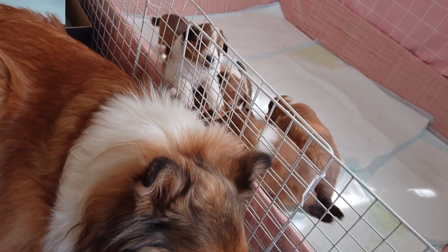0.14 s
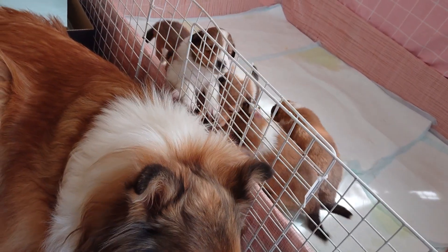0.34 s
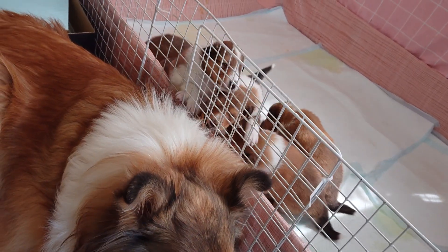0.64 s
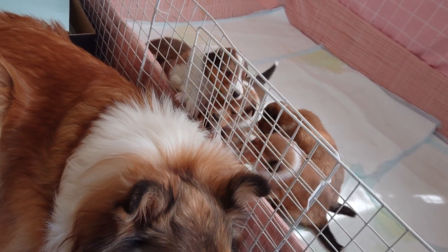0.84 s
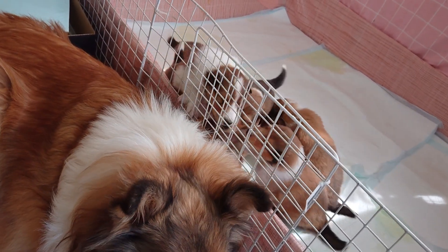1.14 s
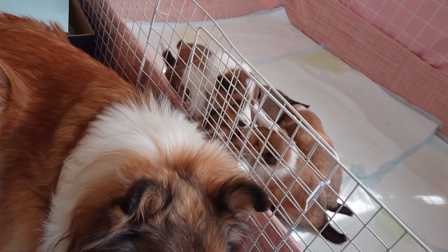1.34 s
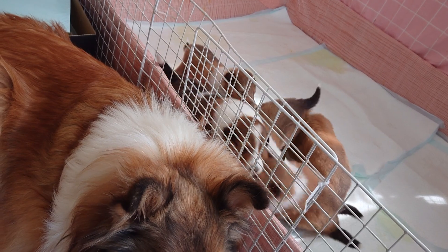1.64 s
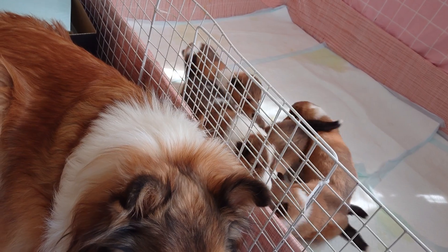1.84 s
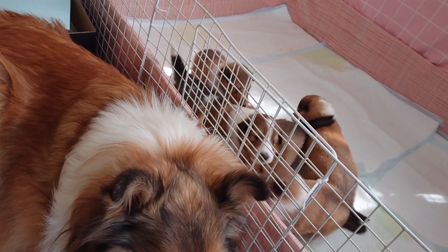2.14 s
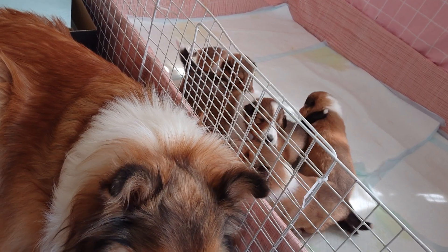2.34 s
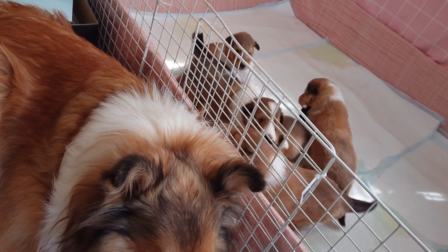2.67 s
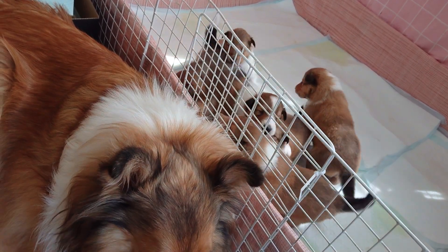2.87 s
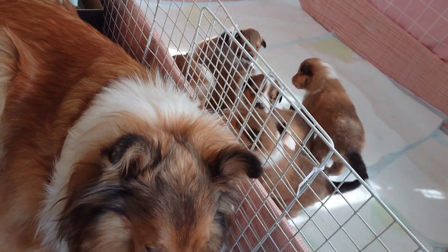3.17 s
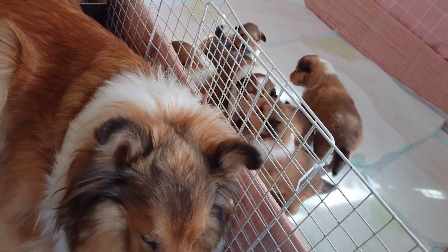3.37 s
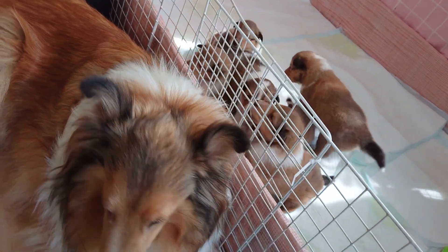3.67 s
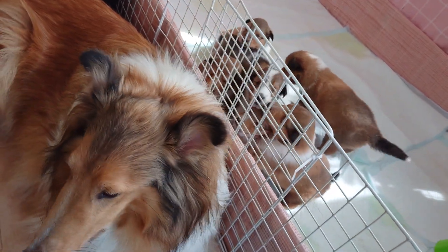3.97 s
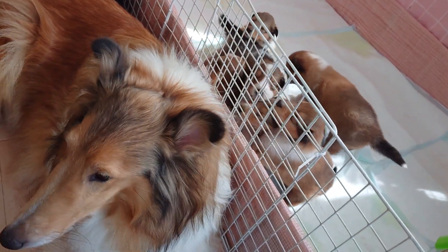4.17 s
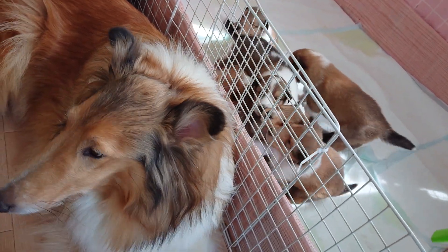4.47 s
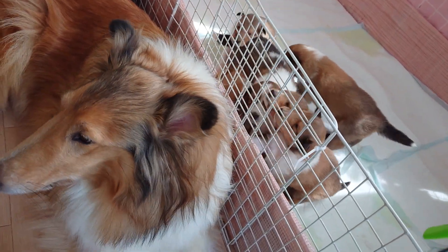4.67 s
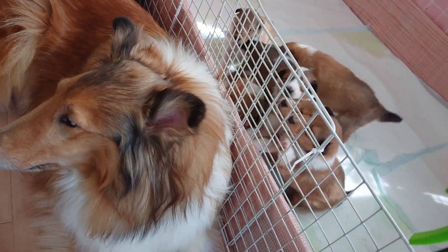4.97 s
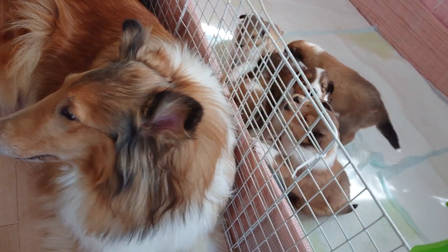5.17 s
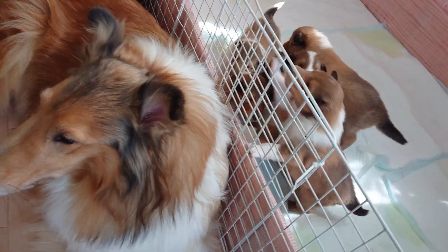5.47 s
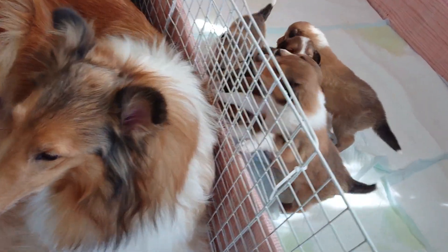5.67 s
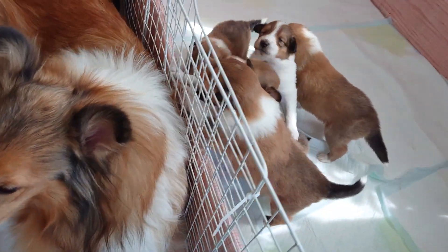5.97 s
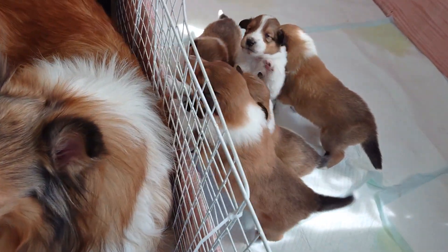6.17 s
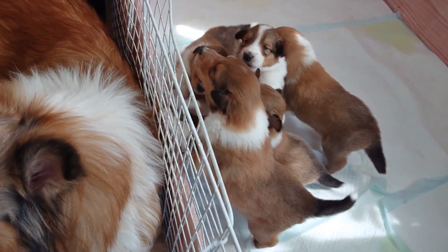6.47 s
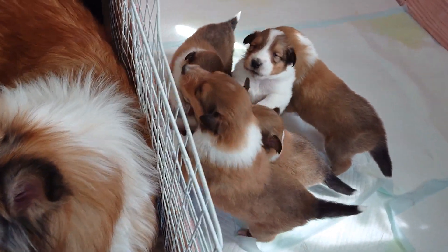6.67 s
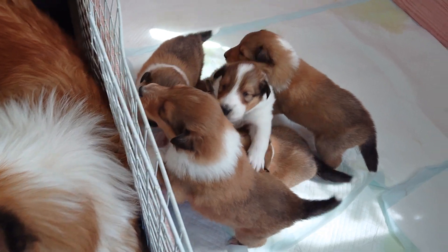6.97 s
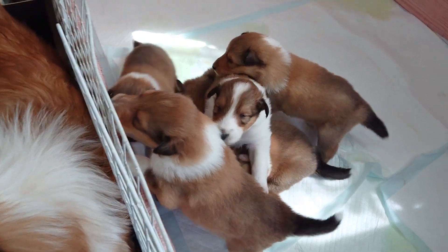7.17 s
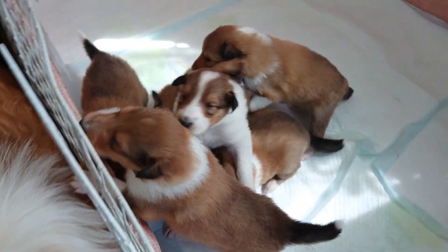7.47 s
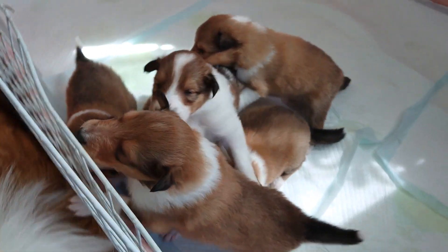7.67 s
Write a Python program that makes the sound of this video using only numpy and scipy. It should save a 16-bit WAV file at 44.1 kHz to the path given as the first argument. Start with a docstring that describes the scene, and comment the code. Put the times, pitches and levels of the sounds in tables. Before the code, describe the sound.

Two thin high peeps open over faint room air, with light claw taps. A flurry of ticking claws and scuffing paws follows, then low, short puppy whimpers come one after another. The wire pen rattles sharply, and afterwards the puppies squirm more busily, bumping and scratching while their whines grow stronger. Heard close by in stereo, indoors, with a short room tail.

```python
"""Young puppies in a wire pen

Puppies whimper in short arched tones and whistle thinly: near-pure tones with faint, patchy overtones.
Claws tick as damped mat modes plus grit; paws scuff as stick-slip grains; bodies bump as low noise.
Jolts ring the pen's frame and wires. Sources get short room tails over faint room air; two ports hear all.
"""
import sys
import numpy as np
from scipy import signal
from scipy.fft import rfft, irfft
from scipy.io import wavfile
from scipy.ndimage import uniform_filter1d

SR = 44100
rng = np.random.default_rng(int(sys.argv[2]) if len(sys.argv) > 2 else 0)


def generate_wav(sig):
    """Save sig (samples, or channels by samples) to the path in sys.argv[1] as 16-bit PCM at SR."""
    pcm = np.round(np.clip(np.atleast_2d(sig).T, -1, 1) * 32767).astype(np.int16)
    wavfile.write(sys.argv[1], SR, pcm)


N = 344862
TOP_HZ = 15900  # upper edge of the microphone and of the overtones

# paws sliding over the mat: start/s, peak/s, end/s, level/dB, treble/dB, added weight/dB
SCUFFS = [(0.921, 0.999, 1.06, -48.5, 6, -20), (1.478, 1.57, 1.74, -72.5, -7, 22),
          (1.735, 1.902, 2.04, -36, 5.5, 1.5), (2.044, 2.051, 2.11, -34.5, 4.5, 1),
          (2.84, 2.875, 3.00, -33.5, 2.5, -7), (4.08, 4.1, 4.15, -40, 0, -2.5),
          (4.401, 4.429, 4.52, -37.5, 4.5, -1), (4.558, 4.561, 4.67, -42, 4.5, -12),
          (5.459, 5.487, 5.66, -31.5, 7, 2.5), (5.812, 5.818, 5.93, -30, -42, -3.5),
          (5.979, 6.083, 6.36, -49.5, 2.5, -1.5), (6.42, 6.44, 6.51, -43.5, 2, 3),
          (6.514, 6.523, 6.66, -41, 1.5, 4.5), (6.671, 6.681, 6.82, -43, 4.5, 0.5),
          (7.126, 7.156, 7.23, -31.5, -0.5, -6.5), (7.291, 7.313, 7.48, -33.5, 4.5, 6),
          (7.56, 7.687, 7.81, -56, 11, -8)]
# rasp of a paw on the mat: f/Hz, gain/dB
RASP = [(60, -22), (200, 2), (350, 5), (600, 2.5), (1400, -5.5), (2300, 2), (3400, -3), (5500, -5.5),
        (8000, -14.5), (15000, 1)]


def undb(db):
    """Decibels to gain."""
    return 10 ** (np.asarray(db) / 20)


def unit(x):
    """Scale to an rms of one."""
    return x / np.sqrt(np.mean(x ** 2) + 1e-20)


def read(points, hz):
    """Value of a (f/Hz, dB) spectrum at hz, on a log-frequency axis."""
    f, value = np.transpose(points)
    return np.interp(np.log(np.maximum(hz, 1)), np.log(f), value)


def colour(x, points, size=4096):
    """Minimum-phase filter with the gain of (f/Hz, dB) points, by folding the cepstrum."""
    log_gain = np.log(undb(read(points, np.fft.rfftfreq(size, 1 / SR))))
    cepstrum = irfft(log_gain)
    cepstrum[1:size // 2] *= 2
    cepstrum[size // 2 + 1:] = 0
    response = irfft(np.exp(rfft(cepstrum)))
    filtered = signal.fftconvolve(np.atleast_2d(x), response[None], axes=1)
    return filtered[:, :x.shape[-1]].reshape(x.shape)


def band(x, hz, kind, order=2):
    """Butterworth filter."""
    return signal.sosfilt(signal.butter(order, hz, kind, fs=SR, output="sos"), x)


def walk(n, rate_hz):
    """Smoothed random steps at rate_hz; spread near one."""
    k = max(int(SR / rate_hz), 1)
    steps = np.repeat(rng.standard_normal(n // k + 1), k)
    return uniform_filter1d(steps, k)[:n] * np.sqrt(3 / 2)


def add(out, s, sound, pan_db=0):
    """Mix a sound into both channels at time s; pan_db is left minus right."""
    i = max(int(s * SR), 0)
    sound = np.atleast_2d(sound)[:, :max(N - i, 0)]
    out[:, i:i + sound.shape[1]] += sound * undb(np.array([[pan_db], [-pan_db]]) / 2)


def grains(n, rate_hz, spread_db):
    """Dense tiny slips of either sign: many small ones and a few large."""
    chance = rng.random((n, 3))
    size = undb(spread_db * np.minimum(-np.log(1 - chance[:, 0]), 4))
    happens = chance[:, 1] < rate_hz / SR
    return unit(happens * size * np.sign(chance[:, 2] - .5))


def ring(modes, t):
    """Free decay of (f/Hz, level/dB, t60/s) modes."""
    return sum(undb(db) * np.sin(2 * np.pi * hz * t) * np.exp(-np.log(1000) * t / t60_s)
               for hz, db, t60_s in modes)


def brighten(x, treble_db):
    """Sharper contact gives more of the top octave."""
    return colour(x, [(5000, 0), (10000, treble_db)], size=256)


def air(level_db=-54.5, waver_db=0.04):
    """Steady room rumble, much alike in both channels, under a faint hiss that is less so."""
    # room air: f/Hz, relative density/dB
    air_spectrum = [(25, -12), (36, -14), (46, 12), (62, 1.5), (80, 3), (98, 1.5), (140, -12), (300, -12),
                    (500, -17.5), (850, -12), (2200, -19.5), (4000, -35), (8000, -45), (15000, -19)]
    mid, side = rng.standard_normal((2, N))
    side = 0.19 * side + 1.2 * band(side, 1000, "high", order=1)
    noise = unit(colour(np.array([mid + side, mid - side]), air_spectrum, size=16384))
    return undb(level_db + waver_db * walk(N, 2.66)) * noise


def fidgeting(early_db=-70, late_db=-62, treble_db=7):
    """Faint stick-slip rustle of fur and small feet, busier as the litter piles up: its level climbs."""
    slips = np.array([grains(N, 500, 4) for _ in range(2)])
    rustle = brighten(unit(colour(slips, RASP)), treble_db)
    return rustle * undb(np.linspace(early_db, late_db, N))


def bumps(rise_s=0.0016, fall_s=0.012, trim_db=3):
    """Soft contacts of paws and bodies push for longer, so they carry little treble."""
    # contacts: t/s, level before trim and envelope/dB, upper edge/Hz
    contacts = [(0.08, -59, 520), (0.384, -70, 520), (1.375, -66, 1610), (1.58, -63, 140),
                (1.851, -42, 130), (2.417, -46.5, 477), (2.848, -38.5, 480), (2.944, -46, 507),
                (3.119, -47, 1500), (3.368, -51, 760), (3.482, -46.5, 125), (3.51, -52, 458),
                (3.77, -57, 800), (4.564, -43, 380), (5.20, -45.5, 134), (5.821, -35, 207),
                (6.314, -45, 590), (6.53, -44.5, 336), (6.538, -30.5, 151), (7.298, -37.5, 107),
                (7.469, -42, 250), (7.601, -38.5, 89)]
    out, t = np.zeros((2, N)), np.arange(SR // 4) / SR
    push = (1 - np.exp(-t / rise_s)) * np.exp(-t / fall_s)
    for s, db, edge_hz in contacts:
        thud = unit(band(rng.standard_normal(len(t)), [edge_hz / 4.9, edge_hz], "band"))
        add(out, s, undb(db + trim_db) * thud * push)
    return out


def pen(chatter_s=0.0033, clash_db=-2, clash_s=0.073, thud_rise_s=0.0014, clash_hz=7500):
    """A jolt rocks the frame; the wire panels chatter against each other and ring on."""
    # jolts: t/s, frame thud/dB, wire shiver/dB
    jolts = [(5.473, -36.5, -33), (5.522, -36.5, -34.5), (5.715, -44, -39), (5.75, -44.5, -34.5)]
    # frame modes: f/Hz, level/dB, t60/s
    frame_modes = [(64.7, -11.5, 1), (99.7, 3.5, 0.24), (138, -8.5, 0.79), (156.3, -6, 0.35),
                   (305.3, -12, 0.56)]
    # wire modes: f/Hz, level/dB, t60/s
    wire_modes = [(2869, -14, .5), (6977, -6, .45), (7900, -8, .4), (10170, 0, .4), (10870, 0, .45),
                  (11225, -3, .5), (11353, -3, .4), (11726, 0, .4), (12050, -6, .5), (12709, 1, .35),
                  (13750, 1, .4), (14340, -6, .5), (14790, -5, .3)]
    out, t = np.zeros((2, N)), np.arange(SR // 2) / SR
    thud = ring(frame_modes, t) * (1 - np.exp(-t / thud_rise_s))
    for s, thud_db, wire_db in jolts:
        contacts = np.array([grains(len(t), 5000, 4.5) for _ in range(2)]) * (1 - np.exp(-t / .002))
        chatter = contacts * np.exp(-t / chatter_s)
        wires = signal.fftconvolve(chatter, ring(wire_modes, t)[None], axes=1)[:, :len(t)]
        wires = undb(-8) * wires / wires[:, :SR // 20].std()  # level set over the first 50 ms
        clash = band(contacts, clash_hz, "high") * np.exp(-t / clash_s) * undb(clash_db)
        add(out, s, undb(wire_db) * (wires + clash) + undb(thud_db) * thud)
    return out


def paws(slip_rate_hz=1900, spread_db=4.0, rise_db=20, fall_db=22, weight_db=-9, trim_db=-1):
    """A sliding paw sticks and slips; the weight behind it makes the mat rumble."""
    out = np.zeros((2, N))
    for start, peak, end, db, treble_db, heavy_db in SCUFFS:
        t = np.arange(start, end, 1 / SR)
        press = undb(db + np.interp(t, [start, peak, end], [-rise_db, 0, -fall_db]))
        slips = grains(len(t), slip_rate_hz, spread_db)
        apart = band(grains(len(t), slip_rate_hz, spread_db), 1600, "high") * 0.66  # widens the treble
        rasp = brighten(unit(colour(np.array([slips + apart, slips - apart]), RASP)), treble_db)
        rumble = unit(band(slips, [80, 380], "band")) * undb(weight_db + heavy_db)
        add(out, start, (rasp + rumble) * press * undb(trim_db))
    return out


def catches(count=3, above_db=-43, scatter_db=1.5, pan_spread_db=13):
    """Chance claw taps of a hard-pressed sliding paw, gathered round its peak; rows as in claws()."""
    peak_offset_db, crunch_offset_db = -6.5, -11.5  # over the scuff's level
    rows = []
    for start, peak, end, db, *_ in SCUFFS:
        if db <= above_db:  # only the pad slides
            continue
        for when, size, side in rng.standard_normal((count, 3)):
            s = np.interp(when, [-3, -.5, 3], [start, peak, end])
            catch_db = db + scatter_db * size
            rows.append((s, catch_db + peak_offset_db, catch_db + crunch_offset_db, pan_spread_db * side))
    return rows


def claws(tap_trim_db=3, crunch_trim_db=17, settle_s=0.00044, crunch_fall_s=0.0013, detune=0.089):
    """Each tap rings claw and mat for some milliseconds, and crunches as the claw settles."""
    # distinct taps on mat and wire, before trims: t/s, peak/dB, crunch/dB, left-right/dB
    taps = [(0.078, -41, -52, 0), (0.1947, -41.5, -52, 5), (0.3102, -46.5, -60, 5), (1.2185, -59, -59, -1),
            (1.3785, -40, -78, 0), (1.4947, -50, -59, 0), (1.7924, -30, -63, -5), (1.8374, -28, -48, -3),
            (1.8422, -31, -55, -4), (1.8902, -28, -50, -3), (1.9076, -30, -57, -2),
            (1.9131, -26.5, -55, -4), (1.957, -34.5, -39, -5), (2.0514, -26.5, -49, 0),
            (2.0565, -27, -47, 4), (2.061, -28, -31, -3), (2.1381, -23, -30, 0.5), (2.4161, -30, -42, 2.5),
            (2.807, -39.5, -48.5, 1), (2.8168, -38.5, -49, 2), (2.8486, -31.5, -45, -1),
            (2.9434, -33, -41, 4), (3.8292, -49, -51, 0), (4.0836, -34, -43, 0), (4.104, -35.5, -46, -7),
            (4.3324, -58, -46, 0), (4.4006, -33, -39, 0.5), (4.4214, -42, -38, -5), (4.563, -48, -46, -2),
            (5.232, -44.5, -48, 3), (5.3647, -37, -48, 3), (5.3906, -34.5, -44.5, 2),
            (5.4131, -29, -40.5, 2.5), (5.8192, -30, -56, -14), (5.869, -34.5, -47, 3),
            (5.982, -30, -42.5, 2.5), (6.3052, -38, -46, 6), (6.3809, -32.5, -41, 2),
            (6.4352, -34, -41.5, 3.5), (6.5306, -30, -41.5, 10), (6.5932, -32.5, -38, 4),
            (6.769, -35, -52, 3), (6.9207, -34, -45, 6), (7.119, -32, -42, 4), (7.1303, -22.5, -34, 2.5),
            (7.1624, -24, -36, 10.5), (7.2664, -26, -38, 3), (7.3242, -28, -45.5, 13),
            (7.4735, -31.5, -36, 7)]
    # claw click and dull mat ring: f/Hz, level/dB, t60/s
    tick_modes = [(336, -10.5, 0.017), (736, -16, 0.018), (1225, -10, 0.015), (2003, 0, 0.0065),
                  (2585, 0.5, 0.0056), (3570, -9, 0.0046), (5270, -9.5, 0.005)]
    # crunch of the settling claw: f/Hz, gain/dB
    crunch_spectrum = [(300, -40), (2500, -2), (5500, -0.5), (8000, -8.5), (11000, 0.5), (15000, 7.5)]
    out, t = np.zeros((2, N)), np.arange(2048) / SR
    settle = (1 - np.exp(-t / settle_s)) * np.exp(-t / crunch_fall_s)
    for s, db, crunch_db, pan_db in list(taps) + catches():
        size = 1 + detune * rng.standard_normal(len(tick_modes))
        # neighbouring modes start in opposite directions
        click = sum((-1) ** i * ring([(hz * size[i], mode_db, t60_s)], t)
                    for i, (hz, mode_db, t60_s) in enumerate(tick_modes))
        click = undb(db + tap_trim_db) * click / np.abs(click).max()
        slips = np.array([grains(len(t), 20000, 3) for _ in range(2)])
        crunch = unit(colour(slips, crunch_spectrum, size=256)) * settle
        add(out, s, click + undb(crunch_db + crunch_trim_db) * crunch, pan_db)
    return out


def arch(start, rise_s, fall_s, start_hz, top_hz, end_hz, drop_power,
         climb_power=1.4, scoop=0.048, scoop_s=0.00695):
    """Times and pitch of one call: it climbs as the puppy pushes and drops as the push gives out."""
    t = np.arange(0, rise_s + fall_s, 1 / SR)
    climb = np.sin(np.pi / 2 * np.minimum(t / rise_s, 1)) ** climb_power
    drop = np.maximum((t - rise_s) / fall_s, 0) ** drop_power
    hz = start_hz + (top_hz - start_hz) * climb + (end_hz - top_hz) * drop
    return start + t, hz * (1 + scoop * np.exp(-t / scoop_s))  # starts a little sharp


def ease(n):
    """How far the effort is below its top: one at both ends of a call, zero in the middle."""
    return np.linspace(-1, 1, n) ** 2


def voice(hz, db, overtone_db, jitter=0.0072, low_jitter=0.025, shimmer_db=1.24, attack_s=0.0035,
          release_s=0.0038, overtone_trim_db=-2.5, effort_db=4.5, count=10):
    """A nearly pure tone with faint, patchy overtones; the folds beat less evenly as the pitch sags."""
    # what throat and nose pass of the overtones: f/Hz, gain/dB
    throat = [(1200, 10), (1500, 12), (1900, 3), (2400, -4), (2900, -18), (3500, -10), (4200, -20),
              (5000, 1), (5700, -2), (6600, -18), (9000, -25), (11000, -17), (15000, -34)]
    t = np.arange(len(hz)) / SR
    slack = np.clip((1000 - hz) / 350, 0, 1)
    hz = hz * (1 + (jitter + low_jitter * slack) * walk(len(t), 350))
    phase = 2 * np.pi * np.cumsum(hz) / SR
    k = np.arange(2, count + 1)[:, None]
    patchy_db = 3.8 * np.array([walk(len(t), 55) for _ in k])
    # slack folds close softly, which leaves less above the octave
    dull_db = -8 * slack * (k > 2)
    gain = undb(read(throat, k * hz) + patchy_db + dull_db) * (k * hz < TOP_HZ)
    overtones = (gain * np.sin(k * phase)).sum(0)
    # overtones are strongest in mid-call, where the effort is greatest
    overtone_level_db = overtone_db + overtone_trim_db - effort_db * ease(len(t))
    tone = undb(db) * np.sin(phase) + undb(overtone_level_db) * overtones
    gate = np.sin(np.pi / 2 * np.clip(np.minimum(t / attack_s, (t[-1] - t) / release_s), 0, 1)) ** 2
    shimmer = undb(shimmer_db * (1 + slack) * walk(len(t), 202.7))
    return np.sqrt(2) * tone * gate * shimmer


def whistles(trim_db=-0.5, flip_s=0.01, collapse_db=17, drop_power=4.9, crack_eases=0.566, crack_db=7):
    """High arches that hold their top, then collapse; a brief crack makes them lower and reedier."""
    # calls: start/s, rise/s, fall/s, start/Hz, top/Hz, end/Hz, crack after/s, crack length/s,
    # crack depth/share of pitch, overtones before trim/dB, left-right/dB
    calls = [ (0.048, .078, 0.047, 1790, 2033, 1180, 0.023, .058, 0.1, -62, 0.5),
             (0.337, .028, .084, 1613, 1735, 994, 0.0304, 0.0274, 0.05, -62.5, 6.5),
             (6.612, .084, .068, 1850, 2010, 1290, .030, 0.045, .11, -60, 4.5),
             (6.935, 0.036, 0.14, 1700, 1904, 1082, 0.032, 0.059, .1, -57, 8)]
    # loudness of each call, before trim: t/s, level/dB
    call_levels = [
        [(0.05, -54), (0.064, -44.5), (0.122, -32), (0.136, -40), (0.16, -42), (0.168, -48)],
        [(0.338, -45), (0.344, -41.5), (0.408, -31), (0.422, -42), (0.438, -43.5), (0.449, -51)],
        [(6.612, -51), (6.682, -28.5), (6.708, -28.5), (6.728, -34.5), (6.748, -26), (6.756, -39.5),
         (6.762, -40)],
        [(6.935, -37), (6.941, -31), (6.995, -25.5), (7.035, -38), (7.079, -44.5), (7.097, -36), (7.109, -44)],
    ]
    out = np.zeros((2, N))
    for (*shape, after_s, crack_s, depth, overtone_db, pan_db), levels in zip(calls, call_levels):
        t, hz = arch(*shape, drop_power)
        fallen_octaves = np.log2(np.maximum.accumulate(hz) / hz)
        since_s = t - t[0] - after_s
        cracked = np.clip(.5 + np.minimum(since_s, crack_s - since_s) / flip_s, 0, 1)
        # a crack eases to crack_eases of its depth
        hz = hz * (1 - cracked * depth * np.interp(since_s, [0, crack_s], [1, crack_eases]))
        db = trim_db + np.interp(t, *np.transpose(levels))
        # collapse_db is per octave fallen, up to half an octave
        reedy_db = crack_db * cracked + collapse_db * np.minimum(fallen_octaves, .5)
        add(out, t[0], voice(hz, db, overtone_db + reedy_db), pan_db)
    return out


def whimpers(drop_power=2.15):
    """Arched calls that grow louder where their pitch crosses a resonance of the muzzle."""
    # calls: start/s, rise/s, fall/s, start/Hz, top/Hz, end/Hz, level/dB, swell (end over start)/dB,
    # bulge (middle over both ends)/dB, overtones before trim/dB, left-right/dB
    calls = [ (0.619, 0.072, 0.055, 1507, 1900, 1070, -42, -2, 4, -72, 4),
             (0.934, 0.015, 0.015, 640, 682, 650, -45, -3, 8, -64.5, -1.5),
             (2.871, .007, 0.023, 620, 648, 630, -41.5, -7, 2, -61, -2),
             (3.581, 0.0075, 0.059, 720, 688, 674, -48.5, -7, 4.5, -58.5, -1),
             (4.002, .005, .017, 630, 634, 600, -43, -15, 16, -61, -1.5),
             (4.214, 0.051, 0.025, 683, 891, 660, -36.5, 2.5, 8.5, -58.5, -2),
             (4.458, 0.057, 0.018, 650, 774, 650, -39, 3, 5.5, -65, -3),
             (4.702, 0.098, 0.062, 738, 1001, 730, -39, 7, 7, -61.5, -0.5),
             (5.030, 0.11, .044, 789, 1169, 691, -47.5, 0.5, -5.5, -60, 2),
             (5.351, 0.081, 0.071, 782, 1132, 685, -46, 5, -3, -56.5, 1),
             (5.656, 0.026, 0.035, 769, 887, 630, -37.5, 4.5, -1, -57, -2),
             (5.745, .045, 0.011, 620, 850, 810, -46.5, 5, 4, -57, 0),
             (6.026, 0.045, 0.039, 1047, 1469, 1224, -39.5, 2, 2.5, -60, 1),
             (6.058, 0.0044, .028, 680, 667, 625, -38, -3, 16, -56, -4),
             (6.296, 0.074, .042, 1580, 2200, 1960, -50.5, 3, -0.5, -58, 7),
             (6.542, 0.0304, 0.0326, 699, 723, 666, -39, 0, 4, -61.5, -3),
             (6.790, 0.073, 0.046, 650, 962, 622, -43.5, 6, -4, -62, -0.5),
             (7.080, 0.066, 0.087, 758, 1141, 568, -36, 8, 7, -59, -3),
             (7.282, 0.06, 0.082, 953, 1307, 1110, -28.5, 1, 10, -49.5, -1),
             (7.395, 0.042, 0.026, 485, 723, 700, -35.5, 2, 3, -53.5, 0.5),
             (7.630, 0.065, 0.09, 930, 1246, 1011, -30.5, 4.5, 16, -52.5, 4),
             (7.673, 0.018, .012, 666, 802, 630, -46, 2, 4, -72, -2),
             (7.698, 0.035, .030, 600, 847, 583, -41.5, -1, -4, -63, 2)]
    # what the closed muzzle passes of the fundamental: f/Hz, gain/dB
    muzzle = [(500, -4.5), (730, 2), (860, -2), (1000, -4), (1150, -5.5), (1300, -4), (1720, -2),
              (2200, -10.5)]
    out = np.zeros((2, N))
    for *shape, db, swell_db, bulge_db, overtone_db, pan_db in calls:
        t, hz = arch(*shape, drop_power)
        push_db = db + swell_db * np.linspace(-.5, .5, len(t)) - bulge_db * ease(len(t))
        add(out, t[0], voice(hz, push_db + read(muzzle, hz), overtone_db), pan_db)
    return out


def room(x, wet_db, treble_db, first_s=0.0013, build_s=0.0092):
    """Direct sound plus a short tail off floor and walls; its bass is shared by both channels."""
    # decay: f/Hz, t60/s
    decay_times = [(150, 0.22), (2200, 0.23), (12000, 0.16)]
    t = np.arange(SR // 2) / SR
    hz = np.fft.rfftfreq(len(t), 1 / SR)
    mid, side = rfft(rng.standard_normal((2, len(t))))
    spread = np.minimum(hz / 2200, 1)
    field = np.array([mid + spread * side, mid - spread * side]) / np.sqrt(1 + spread ** 2)
    centres_hz, t60s = np.transpose(decay_times)
    tail = 0
    for share, t60_s in zip(np.eye(len(t60s)), t60s):
        weight = np.interp(np.log(hz + 1), np.log(centres_hz), share)
        tail = tail + irfft(field * weight, len(t)) * np.exp(-np.log(1000) * t / t60_s)
    tail = unit(tail * np.clip((t - first_s) / build_s, 0, 1)) / np.sqrt(len(t))
    # treble travels in a beam: where the source faces decides how much of it reaches the walls
    sent = colour(x.mean(0), [(2200, 0), (4500, treble_db)], size=256)
    return x + undb(wet_db) * signal.fftconvolve(sent[None], tail, axes=1)[:, :N]


def scene():
    """The floor sounds arrive more by way of the walls than the voices do."""
    knocks = room(bumps() + pen(), wet_db=-5, treble_db=-7)
    floor_sounds = room(fidgeting() + paws() + claws(), wet_db=-3.5, treble_db=-.5)
    voices = room(whistles() + whimpers(), wet_db=-11.5, treble_db=8)
    return air() + knocks + floor_sounds + voices


def record(dry):
    """Sound reaches the left port first; the ports notch and lift the treble; both ends are cut."""
    # both microphone ports: f/Hz, gain/dB
    port_response = [(1000, -1), (6000, 0), (8400, -2.5), (9200, -9), (10100, 2), (15500, -12)]
    # difference of the ports: f/Hz, left-right/dB
    port_balance = [(60, 3), (300, 0.8), (1100, 3.5), (2300, -6), (4500, -1), (8000, -5.5), (12000, 0.5)]
    left, right = dry[0], np.pad(dry[1], (3, 0))[:N]  # 3 samples late
    ports = np.array([colour(x, [(hz, sign * db / 2) for hz, db in port_balance])
                      for x, sign in ((left, 1), (right, -1))])
    trimmed = band(colour(ports, port_response), 38, "high", order=8)
    return signal.sosfilt(signal.ellip(10, .2, 70, TOP_HZ, fs=SR, output="sos"), trimmed)


dry = scene()
out = record(dry)
generate_wav(out)
```